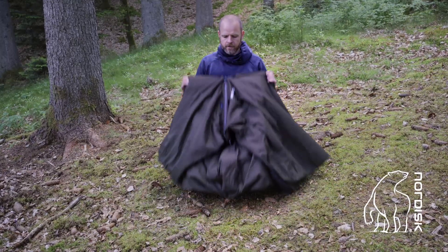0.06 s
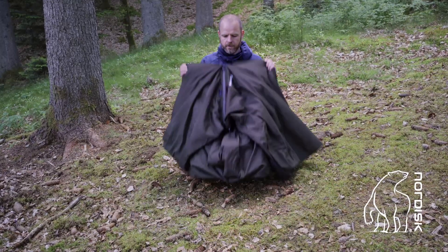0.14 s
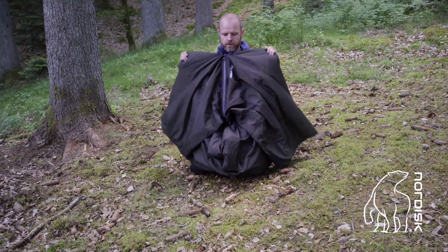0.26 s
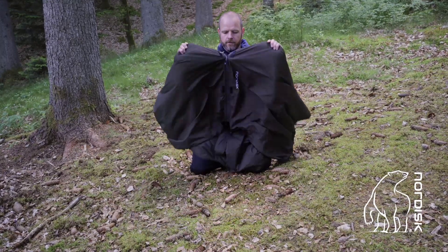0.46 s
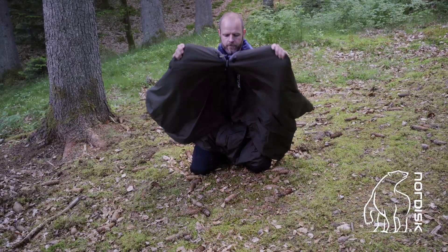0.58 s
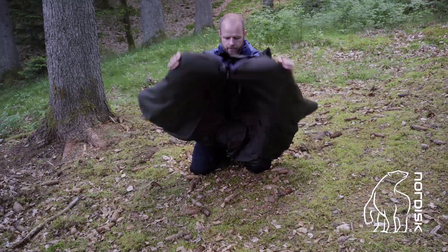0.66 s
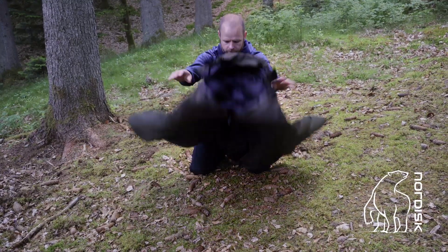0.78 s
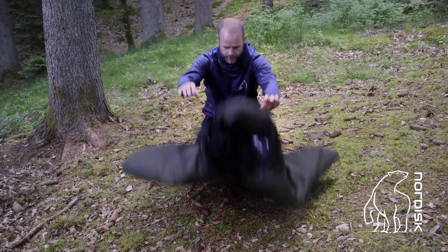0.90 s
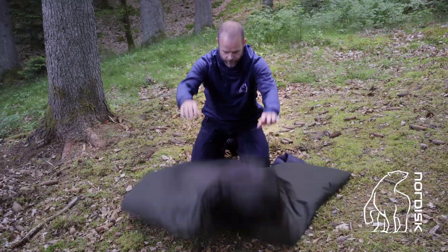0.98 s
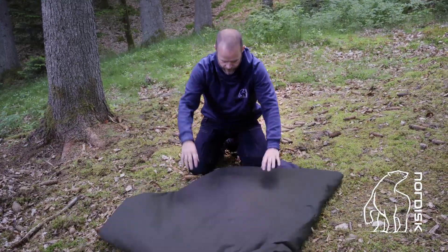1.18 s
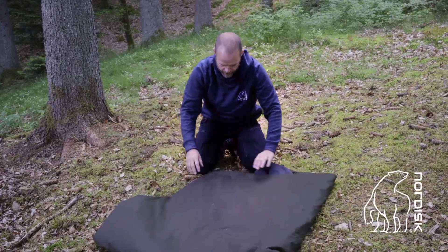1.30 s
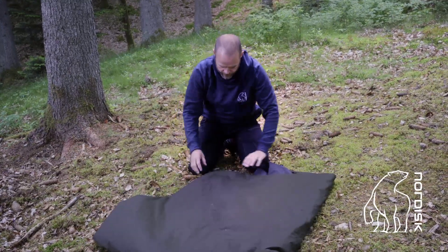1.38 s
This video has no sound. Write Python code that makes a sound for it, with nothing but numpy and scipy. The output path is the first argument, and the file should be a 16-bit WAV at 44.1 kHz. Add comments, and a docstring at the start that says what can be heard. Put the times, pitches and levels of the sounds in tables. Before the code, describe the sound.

A large synthetic fabric bag is shaken out once, with a sharp crack and low puffs of air. It swishes down and lands close by on dry leaves with a light thud, in a quiet wood.

```python
"""In a quiet wood, a large synthetic fabric bag is shaken out once and settles on the leafy ground.
The cloth cracks as it pulls tight, its flaps push low puffs of air, and a fold zips over the weave.
Then the bag billows down, swishing softly as cloth slides on cloth, and lands on dry leaves
with a light thud. Faint, steady air is heard among the trees throughout."""
import sys
import numpy as np
from scipy.fft import rfft, irfft, next_fast_len
from scipy.io import wavfile
from scipy.ndimage import map_coordinates

SR = 44100
rng = np.random.default_rng(int(sys.argv[2]) if len(sys.argv) > 2 else 0)


def wav_out(sig):
    """Save sig, one row per channel (or a flat mono array), as 16-bit PCM at SR to the path in sys.argv[1]."""
    wavfile.write(sys.argv[1], SR, np.round(np.clip(np.atleast_2d(sig).T, -1, 1) * 32767).astype(np.int16))


N = 63945

# the deep tone of air pushed by the bag (frequency [Hz], relative level [dB])
GUST_SPECTRUM = [(15, -28), (30, -3.5), (80, -0.5), (180, -6.5), (280, -10), (500, -33), (1200, -51),
                 (4000, -90)]


def cracks():
    """A fold whips straight or a small crease gives way: one sharp pop, then a short crackle."""
    # each crack (start [s], level [dB], time to fade by 60 dB [s], pop pitch [Hz], pop over crackle [dB])
    snaps = [(.2461, -14.5, 0.027, 980, 9), (.2538, -31, 0.0097, 5000, 0),
             (0.2657, -27.5, 0.014, 4500, 16.5), (.2716, -34.5, 0.0044, 9000, 21),
             (.3882, -19, .003, 2980, 11), (.6415, -39, 0.0065, 5000, 5), (.6793, -27.5, 0.0054, 3620, 8.5),
             (.7537, -40.5, 0.0022, 4000, 12), (1.121, -29.5, .003, 4000, 8), (1.17, -38, .012, 12000, 6),
             (1.2788, -34, 0.0028, 4020, 11), (1.318, -37, 0.0055, 9000, 10)]
    # tone of the crackle (frequency [Hz], relative level [dB])
    crackle_spectrum = [(150, -20), (600, -4.5), (2400, 3), (4000, -0.5), (6500, -17), (8800, -4.5),
                        (11500, -18), (16000, -13)]
    out = np.zeros(N)
    for start, db, fade_s, pop_hz, pop_db in snaps:
        t = np.maximum(since(start), 0)
        phase = 2 * np.pi * pop_hz * t
        pop = -amp(pop_db) * np.sin(phase) * np.exp(-phase / 2.73 + .5)  # dies in about one cycle
        crackle = coloured(noise(), crackle_spectrum) * amp(-60 * t / fade_s)
        out += amp(db) * (t > 0) * (pop + crackle)
    return out


def flaps():
    """Each flap of the cloth sends out a low wave of pressure and a wake of swirling air."""
    # each flap (time [s], level [dB], pitch [Hz], half width of the wake [s])
    beats = [(0.226, -24.5, 110, 0.016), (0.2541, -8, 90, 0.011), (.269, -22, 121, 0.012),
             (0.291, -9.5, 60, 0.0143), (0.3176, -15, 162, 0.0085), (0.337, -16.5, 85, 0.022),
             (.378, -28, 70, 0.027), (.423, -29.5, 94, 0.016), (0.539, -25.5, 70, 0.021),
             (0.654, -30.5, 51.6, 0.023), (0.711, -35.5, 42.5, 0.02)]
    out = np.zeros(N)
    for time, db, hz, wake_s in beats:
        wake = amp(-8) * swell(time, wake_s) * coloured(noise(), GUST_SPECTRUM)
        out += amp(db) * (pressure_wave(time, hz, cycles=0.69) + wake)
    return out


def zipping_fold():
    """A tight fold rasps over the threads in two surges, slowing and growing duller, and stops dead."""
    # tone of the rasp (frequency [Hz], relative level [dB])
    rasp_spectrum = [(150, -10), (400, -25), (1100, -11), (2400, -2), (4200, -2.5), (5400, 1), (7300, -4),
                     (11000, -9.5), (16000, -17.5)]
    length_s, rise_s, stop_s = .040, 0.0054, 0.0015
    first_surge_s, surge_gap_s = 0.0054, 0.024
    start_hz, end_hz = 1500, 741.5  # threads crossed per second
    t = since(.356)
    progress = np.clip(t / length_s, 0, 1)
    thread_hz = (start_hz + (end_hz - start_hz) * progress) * np.exp(.15 * wobble(900))
    threads_crossed = np.cumsum(thread_hz) / SR
    catching = np.exp(-(threads_crossed % 1))  # each thread catches, then lets go
    rasp = unit(catching * noise())
    bright = coloured(rasp, rasp_spectrum, tilt_db=3.0)
    dull = coloured(rasp, rasp_spectrum, tilt_db=-2.5)
    grip = np.clip(t / rise_s, 0, 1) * np.clip((length_s - t) / stop_s, 0, 1)
    surge_db = 1.5 * np.cos(2 * np.pi * (t - first_surge_s) / surge_gap_s)
    return amp(-19.5 + surge_db) * grip * ((1 - progress) * bright + progress * dull)


def billow():
    """Countless soft folds buckle as the bag moves and stirs the air."""
    # loudness of the moving cloth (time [s], level [dB])
    motion = [(0, -39.5), (.025, -38.5), (.06, -43.5), (.11, -39), (.175, -36.5), (.205, -40), (.24, -36.5),
              (.31, -31), (.42, -30), (.52, -34), (.58, -38), (.63, -40.5), (.69, -39.5), (.76, -44),
              (.79, -54), (.83, -42.5), (.87, -51.5), (.95, -44.5), (1.0, -54)]
    # tone of the soft folds (frequency [Hz], relative level [dB])
    fold_spectrum = [(30, -18), (100, -10.5), (250, -6.5), (480, -4), (750, -7), (1600, -15.5), (3000, -21),
                     (6000, -30.5), (16000, -50)]
    folds = coloured(grains(rate=9000, spread_db=3.5), fold_spectrum) * amp(0.72 * wobble(69.8))
    draught = amp(-9) * coloured(noise(), GUST_SPECTRUM)
    return (folds + draught) * level(motion)


def landing():
    """The bag spreads over the ground with dull thuds and crushes dry leaves in small clumps."""
    # loudness of the bag pressing on the ground (time [s], level [dB])
    contact = [(.93, -59), (.982, -42), (1.025, -35), (1.06, -36), (1.115, -33.5), (1.18, -36.5),
               (1.215, -37.5), (1.31, -41.5), (1.37, -41), (1.42, -54.5), (1.45, -68)]
    # the bag and its cushion of air meeting the ground (time [s], level [dB], pitch [Hz])
    bumps = [(1.015, -35.5, 213), (1.037, -31, 305), (1.078, -32, 260), (1.116, -35, 168),
             (1.158, -36, 250), (1.177, -26.5, 288)]
    # tone of cloth and air against the ground (frequency [Hz], relative level [dB])
    ground_spectrum = [(30, -6), (130, -5.5), (280, -4.5), (550, -2), (1100, -10.5), (2700, -15.5),
                       (6000, -28.5), (11000, -35), (16000, -35)]
    # tone of the dry leaves (frequency [Hz], relative level [dB])
    leaf_spectrum = [(300, -29), (1200, -15), (3500, 1.5), (6000, -6), (9000, -6.5), (12500, -4.5),
                     (16000, -17)]
    cloth = coloured(noise(), ground_spectrum) * amp(1.1 * wobble(59.6))
    clumps = amp(-11.5 + 3.0 * wobble(130))
    leaves = clumps * coloured(grains(rate=2500, spread_db=7.5), leaf_spectrum)
    thuds = np.zeros(N)
    for time, db, hz in bumps:
        squeezed_air = amp(-6.5) * swell(time, 0.0091) * coloured(noise(), ground_spectrum)
        thuds += amp(db) * (pressure_wave(time, hz, cycles=2.0) + squeezed_air)
    landed = since(contact[0][0]) > 0
    return level(contact) * landed * (cloth + leaves) + thuds


def swishes():
    """Panels of cloth slide over each other in grainy strokes."""
    # each stroke (start [s], length [s], level [dB], tilt towards the treble [dB per octave])
    strokes = [(-.02, 0.068, -41, 2), (0.071, 0.082, -41.5, 3), (.15, 0.1, -41, -4),
               (0.259, 0.018, -33.5, -2), (0.272, 0.068, -46, 9), (0.338, 0.054, -35.5, 4.5),
               (0.393, 0.077, -43.5, 0.5), (0.531, 0.072, -39.5, -1), (0.661, 0.088, -42, -0.5),
               (0.75, 0.069, -51, -1), (0.803, .022, -44, 1.5), (.85, 0.091, -49.5, -1.5),
               (0.901, 0.022, -42.5, -4), (0.985, 0.067, -47, -7), (1.002, 0.052, -43.5, 6),
               (1.068, 0.13, -40.5, -2), (1.2, 0.16, -44, -1)]
    # tone of the rubbing weave (frequency [Hz], relative level [dB])
    weave_spectrum = [(200, -21), (800, -0.5), (2000, -2), (3500, -1), (6000, -1.5), (9000, -3.5),
                      (13000, -8), (16000, -17.5)]
    fade_share = 0.51  # each fade, in and out, takes this share of the length
    out = np.zeros(N)
    for start, length, db, tilt_db in strokes:
        progress = since(start) / length
        fade = np.clip(np.minimum(progress, 1 - progress) / fade_share + .5, 0, 1)
        gain = amp(db + 1.16 * wobble(200)) * fade
        out += gain * coloured(grains(rate=14000, spread_db=6.5), weave_spectrum, tilt_db)
    return out


def edge_flick():
    """An edge of the released bag brushes past in a short, bright scrape."""
    # tone of the scrape (frequency [Hz], relative level [dB])
    scrape_spectrum = [(200, -21), (550, 4), (1000, -8), (2900, -4), (5000, -10), (8000, -3), (12500, -4.5),
                       (16000, -5.5)]
    length_s, rise_s, fall_s = 0.0266, 0.0083, 0.0057
    t = since(.818)
    fade = np.clip(t / rise_s + 0.47, 0, 1) * np.clip((length_s - t) / fall_s + .5, 0, 1)
    gain = amp(-35.5 + 1.8 * wobble(350)) * fade
    return gain * coloured(grains(rate=16000, spread_db=-0.5), scrape_spectrum)


def woodland():
    """Faint, steady air among the trees."""
    # tone of the air in the wood (frequency [Hz], relative level [dB])
    air_spectrum = [(20, 5.5), (50, -5), (120, -8), (350, 2.5), (650, -6.5), (1200, -12), (3000, -13),
                    (7000, -13.5), (10500, -17), (13000, -16.5), (16000, -24)]
    return amp(-47) * coloured(noise(), air_spectrum)


def pressure_wave(time, hz, cycles):
    """A swing of air pressure centred on a time, fading over the given cycles on either side."""
    phase = hz * since(time)
    return -np.sin(2 * np.pi * phase) * np.exp(-(phase / cycles) ** 2)


def swell(time, half_width_s):
    """A brief rise and fall around a time."""
    return np.exp(-np.abs(since(time)) / half_width_s)


def amp(db):
    """Turn decibels into a gain to multiply by."""
    return 10 ** (np.asarray(db) / 20)


def unit(x):
    """Scale a signal to an average strength (rms) of 1."""
    return x / np.sqrt(np.mean(x ** 2) + 1e-20)


def since(time):
    """Seconds since a time, for every sample."""
    return np.arange(N) / SR - time


def level(points):
    """A gain that follows (time [s], level [dB]) points and is silent after the last."""
    times, db = np.transpose(points)
    return amp(np.interp(since(0), times, db, right=-120))


def wobble(rate):
    """A smooth curve through random values, rate of them per second."""
    return map_coordinates(rng.standard_normal(N // 8), [np.arange(N) * rate / SR], mode="wrap")


def filtered(x, response):
    """Scale each frequency in x by the gain response(hz)."""
    size = next_fast_len(N + SR // 4)
    return irfft(rfft(x, size) * response(np.fft.rfftfreq(size, 1 / SR)), size)[:N]


def coloured(x, spectrum, tilt_db=0):
    """Shape the tone of x with a spectrum, tilted by tilt_db per octave, and scale it to strength 1."""
    freqs, db = np.transpose(spectrum)
    octave = lambda hz: np.log2(np.clip(hz, freqs[0], None))
    response = lambda hz: amp(np.interp(octave(hz), np.log2(freqs), db) + tilt_db * octave(hz))
    return unit(filtered(x, response))


def noise():
    """White noise: an even hiss."""
    return rng.standard_normal(N)


def grains(rate, spread_db):
    """Tiny clicks of varied size at random moments, about rate of them per second."""
    clicks = (rng.random(N) < rate / SR) * rng.choice([-1, 1], N)
    sizes = amp(spread_db * np.clip(noise(), -2, 2))
    return unit(clicks * sizes)


def scene():
    """All the sources together in the open air, in one channel."""
    bag = billow() + swishes() + cracks() + zipping_fold() + edge_flick() + flaps() + landing()
    return (bag + woodland())[None]


def record(dry):
    """Cut away the very highest treble."""
    top_hz = 15900
    return filtered(dry[0], lambda hz: hz < top_hz)[None]


dry = scene()
out = record(dry)
wav_out(out)
```